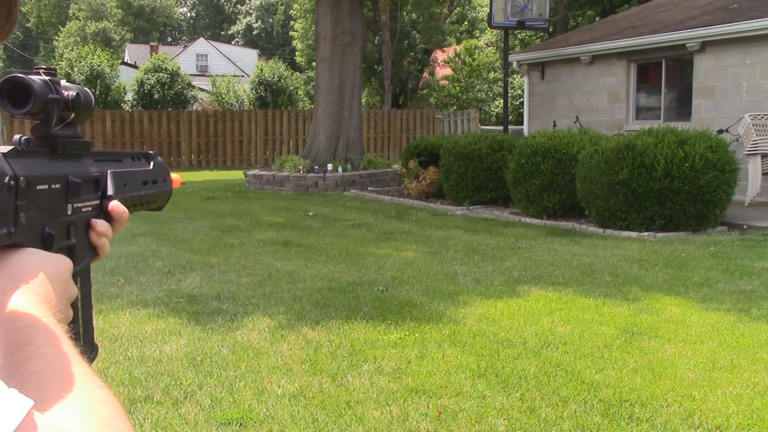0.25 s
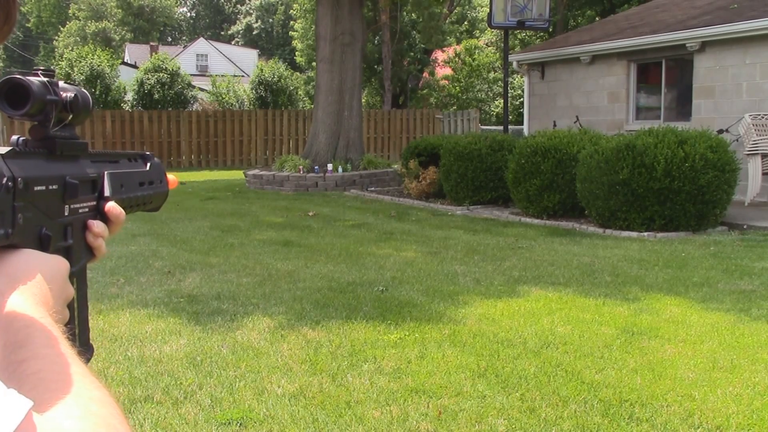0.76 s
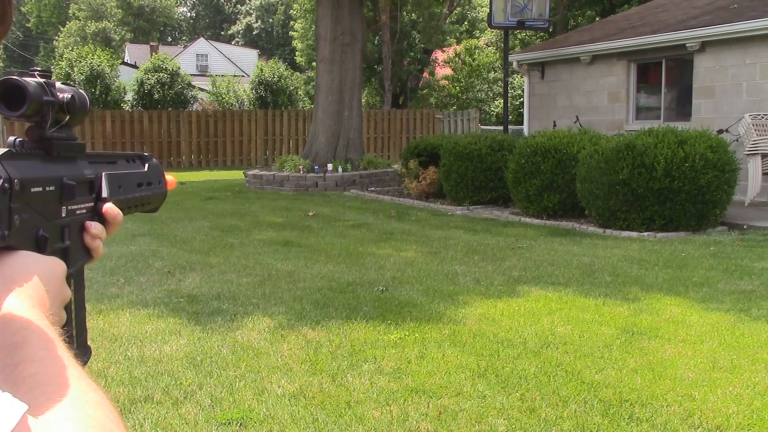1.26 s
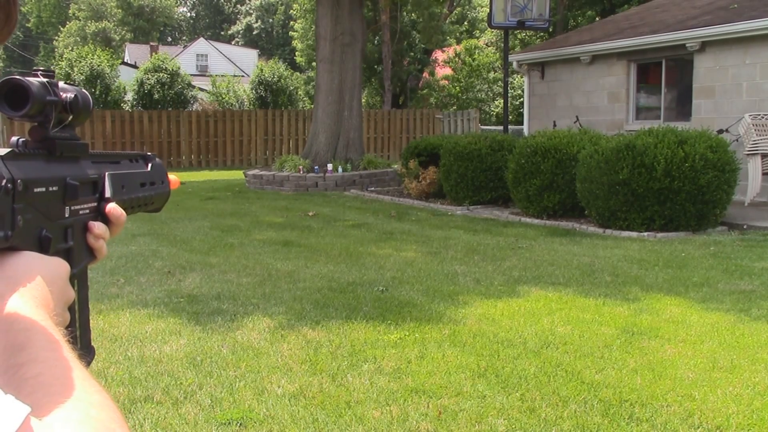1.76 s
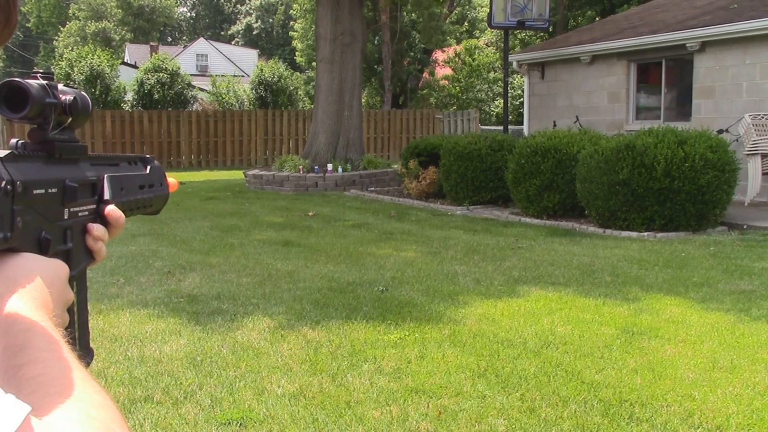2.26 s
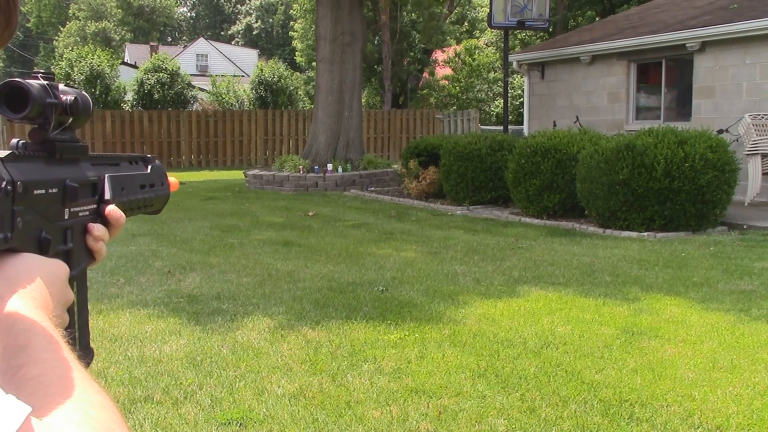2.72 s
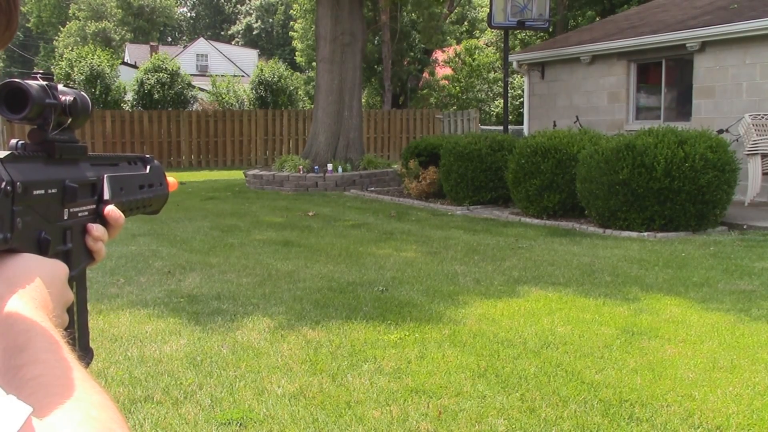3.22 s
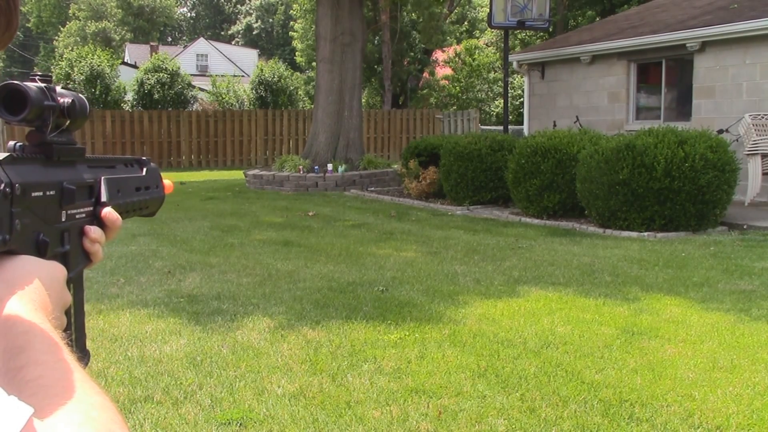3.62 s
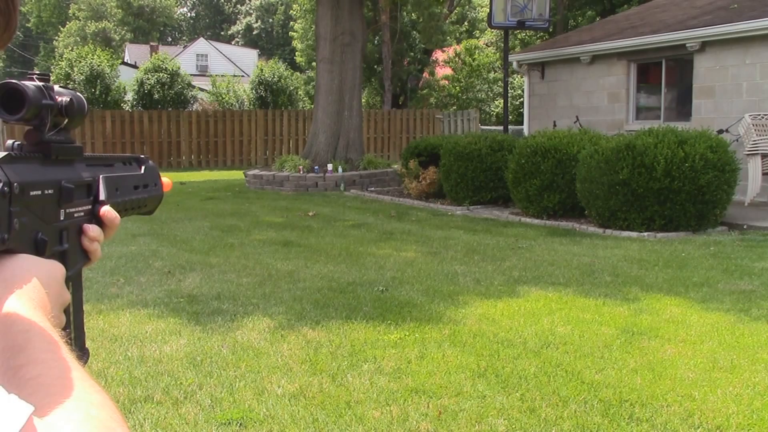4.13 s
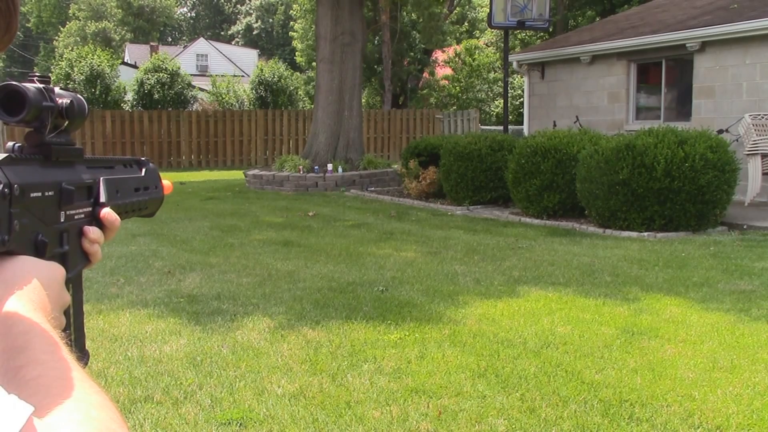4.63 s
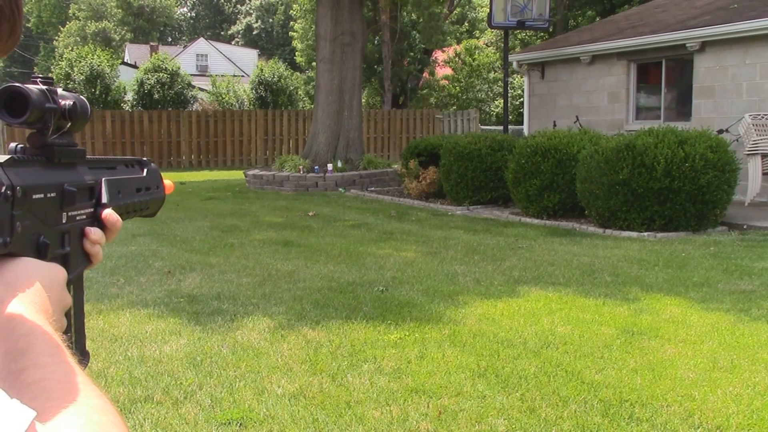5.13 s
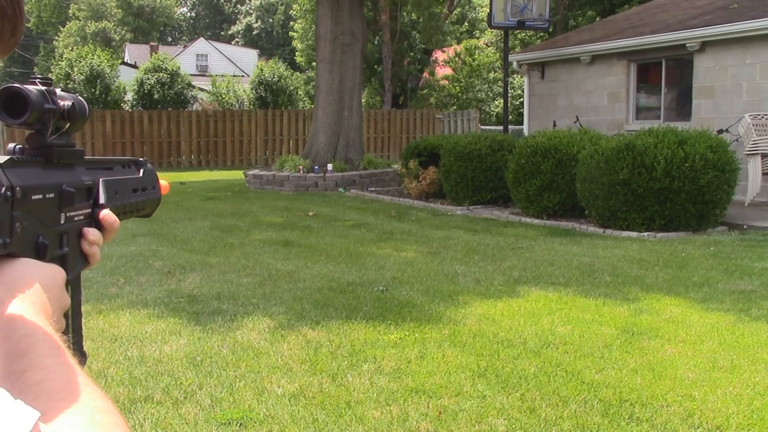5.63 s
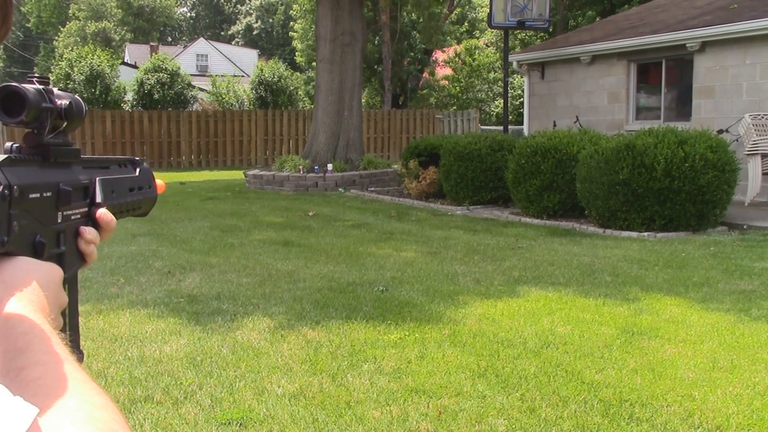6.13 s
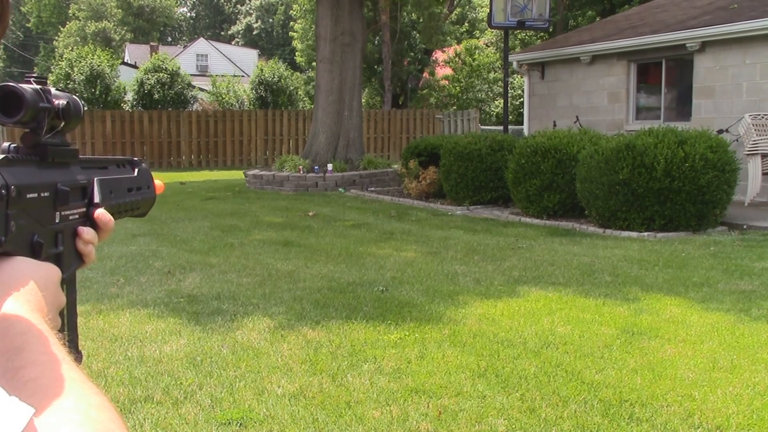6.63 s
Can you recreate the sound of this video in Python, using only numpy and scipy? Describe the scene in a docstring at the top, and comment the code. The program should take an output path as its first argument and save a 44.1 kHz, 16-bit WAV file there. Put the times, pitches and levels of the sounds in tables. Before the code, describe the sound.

In a calm open yard, birds whistle and small handling clicks come first. Then a toy rifle right beside the microphone snaps at a steady pace, pauses slightly mid-way, continues, and fires a last shot after a longer gap. Each snap has a short motor buzz, a faint wall echo and a distant pellet tick; one strike clangs loudly.

```python
"""Quiet back yard: an electric airsoft rifle fires ten shots close by, over the hum of the neighbourhood.
Each cycle winds motor and gears up as chattering tooth tones; noise blows of piston and latch ring the shell.
Filtered cracks and decaying tones are the pellets striking far off; delays and noise tails echo the rifle.
Birds whistle falling notes in gliding partials and chirp in husky sweeps; small clicks rustle nearby."""
import sys
import numpy as np
from scipy import signal
from scipy.fft import rfft, irfft, next_fast_len
from scipy.io import wavfile
from scipy.ndimage import uniform_filter1d

SR = 44100
rng = np.random.default_rng(int(sys.argv[2]) if len(sys.argv) > 2 else 0)


def digitize_waveform(pressure):
    """Quantize a signal to 16-bit integers and store it at the path in sys.argv[1].

    Rows of a 2-D input are taken as channels; values are limited to [-1, 1].
    """
    field = np.atleast_2d(pressure).T
    bounded = np.clip(field, -1, 1)
    quanta = np.round(bounded * 32767).astype(np.int16)
    wavfile.write(sys.argv[1], SR, quanta)


N = 302967


def undb(db):
    """Decibels to gain."""
    return 10 ** (np.asarray(db) / 20)


def band(x, hz, width_hz):
    """Two-pole resonance, gain 1 at the centre."""
    return signal.lfilter(*signal.iirpeak(hz, hz / width_hz, fs=SR), x)


def butter(x, order, hz, kind):
    """Butterworth filter."""
    return signal.sosfilt(signal.butter(order, hz, kind, fs=SR, output="sos"), x)


def shape(x, points):
    """Colours a sound by (hz, db) points, interpolated over log frequency."""
    n = next_fast_len(x.shape[-1])
    hz, db = np.transpose(points)
    bin_hz = np.arange(n // 2 + 1) * SR / n
    gain = undb(np.interp(np.log(bin_hz + 1), np.log(hz), db))
    return irfft(rfft(x, n) * gain, n)[..., :x.shape[-1]]


def add(out, x, s):
    """Mixes x into out at time s."""
    i = int(round(s * SR))
    out[i:i + len(x)] += x[:len(out) - i]


def smooth_noise(n, size):
    """White noise averaged over size samples, which also shrinks it."""
    return uniform_filter1d(rng.standard_normal(n), size=size)


def phase(hz):
    """Running phase of a moving pitch, rad."""
    return 2 * np.pi * np.cumsum(hz) / SR


def burst(x, ms, rise=0.3):
    """A sound that leaps up and dies away by 20 dB in ms; rise is a share of ms."""
    t = np.arange(len(x)) / SR * 1000 / ms
    return x * (1 - np.exp(-t / rise)) * 10 ** -t


# neighbourhood spectrum, relative: hz, db_per_hz
HUM_SPECTRUM = [(15, -55), (25, -33), (60, -16), (111, -5), (229, -4.5), (384, -10.5), (624, -16),
                (1100, -17), (2000, -21.5), (3000, -18.5), (4500, -26.5), (11900, -44), (16000, -54)]
# background level, sinking over the first shots and creeping back: time_s, level_db (80-300 Hz band)
HUM_LEVEL = [(0.0, -52.5), (0.74, -53.5), (2.1, -65), (2.7, -67.5), (3.67, -68), (5.3, -65), (6.0, -62.5),
             (6.87, -63.5)]


def hum():
    """Far traffic and leaves: coloured noise in which each octave swells a little on its own."""
    noise = shape(rng.standard_normal(N), HUM_SPECTRUM)
    bass = butter(noise, 4, [80, 300], "band")
    sway, step = 0, 3000
    for hz in 45 * 2. ** np.arange(9):
        walk = np.repeat(rng.standard_normal(N // step + 1), step)[:N]
        swell_db = 0.47 * uniform_filter1d(walk, size=step)
        sway = sway + undb(swell_db) * band(noise, hz, 0.65 * hz)
    time_s, level_db = np.transpose(HUM_LEVEL)
    return sway / np.std(bass) * undb(np.interp(np.arange(N) / SR, time_s, level_db))


# whistled notes: start_s, length_s, loudest_partial_top_hz, its_level_db, other_partials_offset_db,
# waver_share (before smoothing)
WHISTLES = [(0.037, 0.21, 3540, -56, -10, 0.37), (0.472, 0.46, 3747, -56, -7, 0.16),
            (0.761, 0.14, 3750, -40, -13, 0.13), (2.492, 0.26, 3600, -57, 4.7, .08),
            (4.762, 0.27, 3658, -52.5, -2, 0.063), (5.961, 0.19, 3650, -69, -8.5, .08),
            (6.278, 0.26, 3563, -52, 1.5, .07)]
# multiples 1 to 11 of the whistle pitch: level_db re the loudest
PARTIALS_DB = [-40, -22, -15, 0, -28, -20, -26, -23, -28, -26, -30]
# husky chirps and short faint tones: start_s, length_s, from_hz, to_hz, level_db
CHIRPS = [(0.009, 0.065, 710, 680, -44.5), (0.112, .12, 2450, 2437, -59), (0.272, 0.032, 3150, 1260, -52),
          (0.667, 0.15, 4860, 4960, -62.5), (3.793, 0.0076, 1424, 1350, -52.5),
          (3.806, 0.017, 1380, 1320, -53), (4.755, 0.065, 4180, 4930, -55), (4.808, 0.029, 3720, 2495, -48),
          (5.325, 0.033, 4230, 5100, -50.5), (5.368, 0.03, 4090, 2350, -43),
          (5.33, 0.058, 7700, 7950, -64.5), (5.361, 0.0116, 2070, 2850, -47),
          (5.398, 0.219, 5005, 4880, -70.5), (5.598, 0.016, 3570, 2500, -60)]
SCOOP_HZ, SCOOP_S, SAG_HZ_PER_S = 450, .007, 1450  # at the fourth partial
FADE_DB_PER_S = 14
LEAVES_T60_S, LEAVES_DB = 0.13, -25.5


def whistle(length_s, top_hz, level_db, other_db, waver_share):
    """Reedy note, led by its fourth partial, that scoops up and then sags."""
    t = np.arange(0, length_s, 1 / SR)
    lead_hz = top_hz - SCOOP_HZ * np.exp(-t / SCOOP_S) - SAG_HZ_PER_S * t
    waver = 1 + waver_share * smooth_noise(len(t), 200)
    turn = phase(lead_hz * waver) / 4
    flutter_db = 40 * smooth_noise(len(t), 150)
    voice = 0
    for k, db in enumerate(PARTIALS_DB):
        offset_db = other_db if db < max(PARTIALS_DB) else 0
        voice = voice + undb(db + offset_db) * np.sin((k + 1) * turn + k * k)
    gain = np.sqrt(2) * undb(level_db + flutter_db - FADE_DB_PER_S * t)
    return gain * signal.windows.tukey(len(t), .15) * voice


def chirp(length_s, from_hz, to_hz, level_db):
    """Gliding sine, roughened by fast level noise."""
    n = int(length_s * SR)
    husk = 1 + 4.5 * smooth_noise(n, 60)
    tone = np.sin(phase(np.geomspace(from_hz, to_hz, n)))
    return undb(level_db) * signal.windows.tukey(n, .6) * husk * tone


def birds():
    """Whistles and chirps, smeared by the foliage around the birds."""
    out = np.zeros(N)
    for start_s, *note in WHISTLES:
        add(out, whistle(*note), start_s)
    for start_s, *note in CHIRPS:
        add(out, chirp(*note), start_s)
    t = np.arange(SR // 5) / SR
    leaves = undb(LEAVES_DB - 60 * t / LEAVES_T60_S) * rng.standard_normal(len(t))
    return out + signal.fftconvolve(out, leaves)[:N]


# scattered tail: hz, width_hz, t60_s, level_db (relative)
YARD = [(613, 850, 0.28, -25.5), (2460, 3300, 0.82, -39), (6500, 5200, 0.53, -28.5)]


def yard(x):
    """Leaves and ground scatter a short noise tail that takes a few ms to build up."""
    t = np.arange(SR // 2) / SR
    tail = 0
    for hz, width_hz, t60_s, level_db in YARD:
        noise = band(rng.standard_normal(len(t)), hz, width_hz)
        tail = tail + undb(level_db - 20.5 - 60 * t / t60_s) * noise
    build_up = 1 - np.exp(-(t / 0.0019) ** 2)
    return signal.fftconvolve(x, tail * build_up)[:N]


def click(db, treble_db, bass_db, t60_s, tail_db, crack_ms):
    """A short crack and its noisy tail in bass, middle and treble; the treble fades first."""
    crack_noise, tail_noise = rng.standard_normal((2, SR // 2))
    crack = burst(crack_noise, crack_ms, rise=0.06)
    out = 0
    # hz, width_hz, part_db, tail length as a share of t60_s
    parts = [(740, 1300, bass_db, 0.85), (2700, 3000, 0, 0.84), (8290, 7000, treble_db, 0.3)]
    for hz, width_hz, part_db, share in parts:
        tail = burst(tail_noise, share * t60_s * 1000 / 3, rise=0.037)
        blow = crack + undb(tail_db) * tail
        for _ in range(2):
            blow = band(blow, hz, 1.77 * width_hz)
        out = out + undb(part_db) * np.sqrt(3500 / width_hz) * blow
    return undb(db + 12.5) * out


# small clicks and rustles: start_s, peak_db (nominal), treble_db, bass_db (re middle),
# t60_s (scaled per part in click)
RUSTLES = [(0.018, -36.5, -9, 2, 0.18), (0.1054, -45.5, -1, -4, 0.18), (0.3565, -33.5, 1.5, -4, 0.24),
           (0.463, -54.5, 8, 22, 0.24), (0.5403, -57, 8, 21, 0.29), (1.1936, -35, -3, -45.5, 0.16),
           (2.2033, -44.5, 2.5, -14, 0.2), (2.632, -53, 4, -11, 0.23), (3.4525, -59.5, -5, -7.5, 0.099),
           (5.4625, -53.5, -7, -24, 0.25), (5.62, -42, -28, -15, 0.042), (5.634, -50, -20, -15, 0.15),
           (5.6809, -58, -7.5, 12.5, 0.18), (5.789, -59, 0.8, -14, 0.22), (5.9831, -60.5, 2, -14, 0.1),
           (6.131, -44, 1, -13, 0.31), (6.1916, -48.5, -12, -14, 0.35)]
RUSTLE_TAIL_DB, RUSTLE_CRACK_MS = -8, 1.3


def rustles():
    """Hands and cloth close by: faint cracks with noisy tails."""
    out = np.zeros(N)
    for start_s, db, treble_db, bass_db, t60_s in RUSTLES:
        add(out, click(db, treble_db, bass_db, t60_s, RUSTLE_TAIL_DB, RUSTLE_CRACK_MS), start_s)
    return out


# shots: slam_s, strength_db, take_up_lead_ms, take_up_db (re strength)
SHOTS = [(0.853, 8, 66, -24), (1.3316, 5, 69.7, -22.5), (1.8087, 2, 67.3, -26), (2.2897, -0.5, 65.5, -26),
         (2.8208, -2, 72, -25.5), (3.5824, -2.5, 70, -32), (4.0731, -1.5, 70.4, -30),
         (4.556, -1.5, 72, -28), (5.044, -1.5, 75, -24.5), (6.4916, 1.5, 71.4, -22.5)]
# latch dropping back after most slams: start_s, peak_db (nominal)
LATCHES = [(0.961, -13), (1.44, -17.5), (2.403, -21.5), (2.927, -21), (3.69, -22.5), (4.175, -24.5),
           (4.664, -22.5), (5.15, -23.5)]
TAKE_UP_BRIGHT_DB, TAKE_UP_MS = -27, 8.
LATCH_BRIGHT_DB, LATCH_MS = -18, 13.7


def take_ups_and_latches(dull, bright):
    """The drive takes up before each slam, the latch drops after most: mostly dull noise blows."""
    knocks = []
    for slam_s, strength_db, lead_ms, knock_db in SHOTS:
        knocks.append((slam_s - lead_ms / 1000, strength_db + knock_db, TAKE_UP_BRIGHT_DB, TAKE_UP_MS))
    for start_s, peak_db in LATCHES:
        knocks.append((start_s, peak_db, LATCH_BRIGHT_DB, LATCH_MS))
    for start_s, db, bright_db, length_ms in knocks:
        blow = undb(db + 7) * burst(rng.standard_normal(1500), length_ms, rise=0.07)
        add(dull, band(band(blow, 1150, 2000), 1150, 2000), start_s)
        add(bright, undb(bright_db) * blow, start_s)


# motor and gears through one cycle: from_slam_ms, tooth_rate_hz, whine_db, rattle_db (re strength)
GEARS = [(-66, 400, -55, -43.5), (-52, 580, -36.5, -38.5), (-33, 735, -34.5, -39), (-14.5, 790, -38, -29),
         (21, 750, -42.5, -35), (55, 655, -41, -37), (83, 590, -53.5, -62), (130, 500, -75, -62.5)]
# tooth rate and its multiples: level_db (relative)
TEETH_DB = [-3, 0, -12, -5, -20, -19]
FIZZ_DB, FIZZ_DB_PER_MS = -7, 0.0929  # bright part of the rattle at the slam, and its growth


def gears(dull, bright, direct, grit_db=3.5):
    """Tooth tones follow the motor speed; loose parts chatter, their level jumping every 60 samples."""
    from_slam_ms, tooth_hz, whine_db, rattle_db = np.transpose(GEARS)
    t_ms = np.arange(from_slam_ms[0], from_slam_ms[-1], 1000 / SR)
    n = len(t_ms)
    for slam_s, strength_db, *_ in SHOTS:
        start_s = slam_s + from_slam_ms[0] / 1000
        wobble = 1 + .02 * rng.standard_normal() + .9 * smooth_noise(n, 100)
        turn = phase(np.interp(t_ms, from_slam_ms, tooth_hz) * wobble)
        teeth = sum(undb(db) * np.sin((k + 1) * turn + k * k) for k, db in enumerate(TEETH_DB))
        grit = undb(grit_db * np.repeat(rng.standard_normal(n // 60 + 1), 60)[:n])
        whine_gain = undb(strength_db + np.interp(t_ms, from_slam_ms, whine_db))
        add(direct, whine_gain * uniform_filter1d(grit, size=60) * teeth, start_s)
        rattle_gain = undb(strength_db + np.interp(t_ms, from_slam_ms, rattle_db))
        rattle = rattle_gain * grit * rng.standard_normal(n)
        add(dull, band(rattle, 1400, 2300), start_s)
        add(bright, undb(FIZZ_DB + FIZZ_DB_PER_MS * t_ms) * rattle, start_s)


# piston slip, slam and rebounds: from_slam_ms, first_blow_db, shudder_db (re strength),
# bright_db (re dull), length_ms
CYCLE = [(-14, -9, -14.5, -9, 7.8), (-7.5, -11.5, -20, -11, 9.9), (-4, 2.5, -19, -9, 2.5),
         (-0.5, -1, 1.5, -25.5, 3.4), (-0.17, 9, -7, 2, 1.2), (0.9, 3, -13.5, -32.5, 2.2),
         (3, -1.5, -16.5, -0.3, 2.1), (5, -2.2, -19.5, -9, 3.6), (9.5, -6, -20.5, -10, 4.1),
         (16, -20, -24, -10.5, 14), (25, -13, -19.5, -10, 10)]


def piston(dull, bright, alike=0.77):
    """Every cycle repeats nearly the same knocks: an impulse, then a noisy shudder."""
    habit = rng.standard_normal((len(CYCLE), 1500))
    for slam_s, strength_db, *_ in SHOTS:
        for (from_slam_ms, first_db, shudder_db, bright_db, length_ms), usual in zip(CYCLE, habit):
            noise = alike * usual + np.sqrt(1 - alike ** 2) * rng.standard_normal(1500)
            blow = undb(shudder_db) * burst(noise, length_ms, rise=0.057)
            blow[0] = undb(first_db)
            start_s = slam_s + from_slam_ms / 1000
            add(dull, undb(strength_db) * blow, start_s)
            add(bright, undb(strength_db + bright_db) * blow, start_s)


THUMP_HZ, THUMP_DB = 104, -36  # level re strength


def recoil(direct):
    """The whole rifle recoils: a short low sine at each slam."""
    sine = np.sin(2 * np.pi * THUMP_HZ * np.arange(2000) / SR)
    for slam_s, strength_db, *_ in SHOTS:
        add(direct, undb(strength_db + THUMP_DB) * burst(sine, 20., rise=.1), slam_s)


# rings of the plastic shell: hz, width_hz, level_db (relative)
SHELL = [(372.6, 90, -3), (588, 130, 1.5), (1160, 140, -1), (1486, 250, 1), (2363, 490, -1),
         (3230, 500, 3.5), (4430, 740, -0.5), (6700, 1500, 0.5), (9100, 7300, -10)]


def shell(dull, bright):
    """Soft blows reach the low rings of the shell, hard ones the high rings."""
    blows = butter(dull, 2, 3700, "low") + butter(bright, 2, 3700, "high")
    out = 0
    for k, (hz, width_hz, db) in enumerate(SHELL):
        # neighbours ring in opposite sense, except the lowest pair, which leaves a gap between them
        sign = (-1) ** max(k, 1)
        out = out + sign * undb(db) * band(blows, hz, width_hz)
    return 2.637 * out


def rifle():
    """Blows and rattle ring the shell; gear whine and recoil sound directly."""
    dull, bright, direct = np.zeros((3, N))
    take_ups_and_latches(dull, bright)
    gears(dull, bright, direct)
    piston(dull, bright)
    recoil(direct)
    return shell(dull, bright) + direct


# house and fence: delay_ms, level_db (before filtering)
ECHOES = [(52, -32.5), (90, -40), (139.6, -24.5), (151, -59)]


def echoes(x):
    """Walls send back two bands of each shot, one around 2.7 kHz and a weaker one around 9.5 kHz."""
    walls = np.zeros(SR // 4)
    for delay_ms, level_db in ECHOES:
        add(walls, undb([level_db]), delay_ms / 1000)
    response = band(walls, 2700, 1200) + undb(-10.5) * band(walls, 9500, 6000)
    return signal.fftconvolve(x, response)[:N]


# pellet strikes and bounces: start_s, peak_db (nominal), treble_db, bass_db (re middle),
# tail_db (re crack), knock_hz
STRIKES = [(1.0308, -29, 8.5, -25, -19, 3460), (1.0403, -33.5, 2.4, -15.5, -11, 4100),
           (1.5072, -40, 6, -30.5, -16.5, 3470), (1.5128, -37, 12, -31.5, -19, 2900),
           (1.5205, -41.5, 11, -28.5, -15, 4000), (1.978, -22.5, -13.5, -27.5, -17.5, 3570),
           (1.997, -32.5, 8.5, -40.5, -17.5, 2790), (2.4579, -25, 3.5, -19, -14, 3270),
           (2.9882, -4.5, -7, -31.5, -19, 2190), (2.997, -20, -16, -16.5, -16.5, 2300),
           (3.7636, -36.5, 13, -24, -22, 4090), (3.7721, -46.5, 3, -12.5, -14, 2800),
           (4.248, -41.5, 4.5, -19, -15.5, 2750), (4.326, -41.5, -10, -25.5, -16.5, 3280),
           (4.729, -44, 10.5, -23, -13.5, 3610), (4.74, -32.5, -31, -13, -17.5, 4300),
           (5.21, -7, -6.5, -9, -23.5, 4120), (5.2186, -23.5, -20.5, 8, -17.5, 1160),
           (6.6512, -36, -5.5, -17, -32, 3500), (6.669, -28, 3.5, -22, -20.5, 2060)]
# rings of the loose target: hz, level_db (relative), t60_s
TARGET = [(492, -7, .45), (972, -2, .5), (1350, -6, .55), (1507, -6, .5), (2050, -7, .2), (2470, -4, .7),
          (3290, -6, .35), (4300, -9, .33)]
KNOCK_DB, KNOCK_WIDTH = 4, 0.11  # level re strike, bandwidth as a share of pitch
STRIKE_T60_S, STRIKE_CRACK_MS = 0.17, 1.17  # t60 scaled per part in click
RING_S, RING_DB = 2.9882, -15.5  # the one square hit


def pellets(blur_hz=90.):
    """Each strike cracks, knocks at its own pitch and scatters; one leaves the target ringing unevenly."""
    out, t = np.zeros(N), np.arange(SR // 2) / SR
    for start_s, db, treble_db, bass_db, tail_db, knock_hz in STRIKES:
        decay_ms = 1000 * np.log(10) / (np.pi * KNOCK_WIDTH * knock_hz)
        knock = burst(np.sin(2 * np.pi * knock_hz * t), decay_ms, rise=0.059)
        crack = click(db, treble_db, bass_db, STRIKE_T60_S, tail_db, STRIKE_CRACK_MS)
        add(out, crack + undb(db + KNOCK_DB) * knock, start_s)
    shake = rng.standard_normal(len(t))
    for hz, level_db, t60_s in TARGET:
        add(out, undb(RING_DB + level_db - 60 * t / t60_s) * band(shake, hz, blur_hz), RING_S)
    return out


# side against mid: hz, level_db
WIDTH = [(110, -25.5), (600, -29.5), (2000, -25.5), (5000, -13.5), (14000, -19)]


def scene():
    """All sources; the two microphones sit close, so only a faint, phase-turned part differs."""
    gun, song, background = rifle(), birds(), hum()
    near = gun + pellets() + rustles()
    far_song = undb(10) * song  # birds sit deeper in the yard: more tail
    mid = near + echoes(gun) + yard(near + far_song) + song + background
    quarter_turned = signal.hilbert(mid, next_fast_len(N)).imag[:N]
    # the diffuse background reaches the two ports less alike
    side = shape(quarter_turned + 1.5 * np.roll(background, 700), WIDTH) + .026 * mid
    return np.array([mid + side, mid - side])


CEILING, TOP_HZ = .95, 15900


def record(dry):
    """Camera housing thins deep bass, notches treble and dulls the top; loud peaks round off at a ceiling."""
    heard = butter(dry, 1, 45, "high")
    heard = heard - .55 * band(heard, 5800, 1100)
    heard = heard - .8 * band(heard, 14800, 5000)
    rounded = heard / (1 + np.abs(heard / CEILING) ** 4) ** (1 / 4)
    low_pass = signal.ellip(8, .2, 70, TOP_HZ, fs=SR, output="sos")
    return np.clip(signal.sosfilt(low_pass, rounded), -1, 1)


dry = scene()
out = record(dry)
digitize_waveform(out)
```